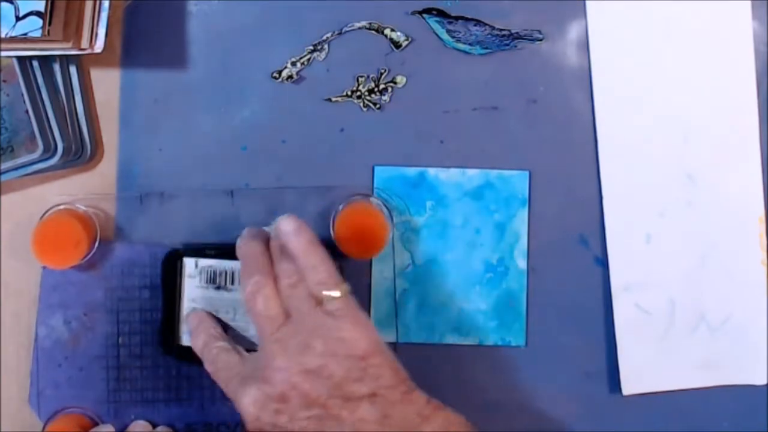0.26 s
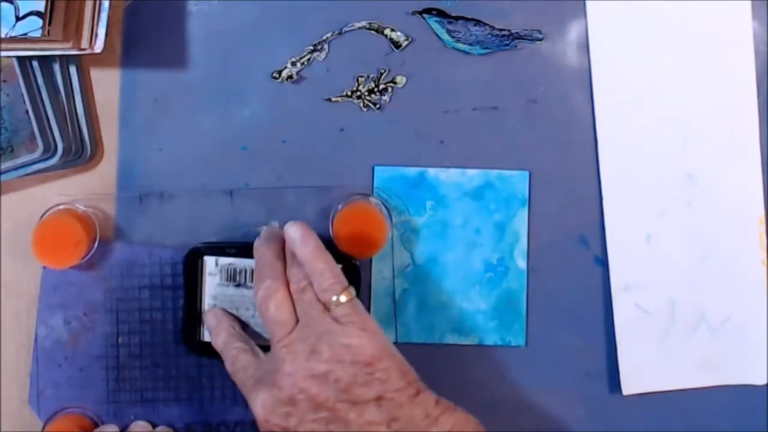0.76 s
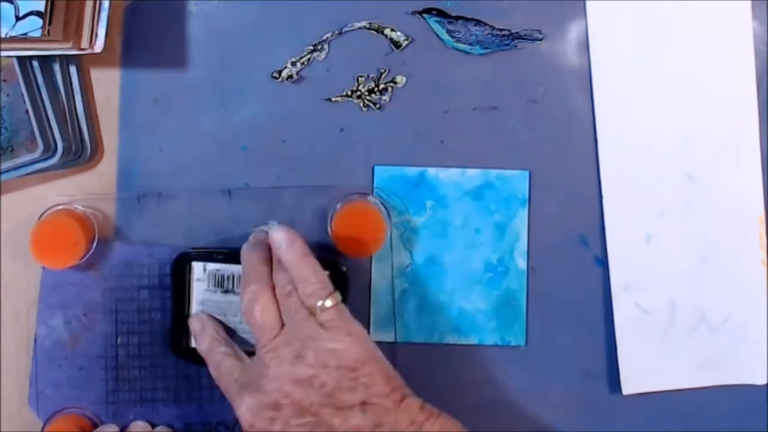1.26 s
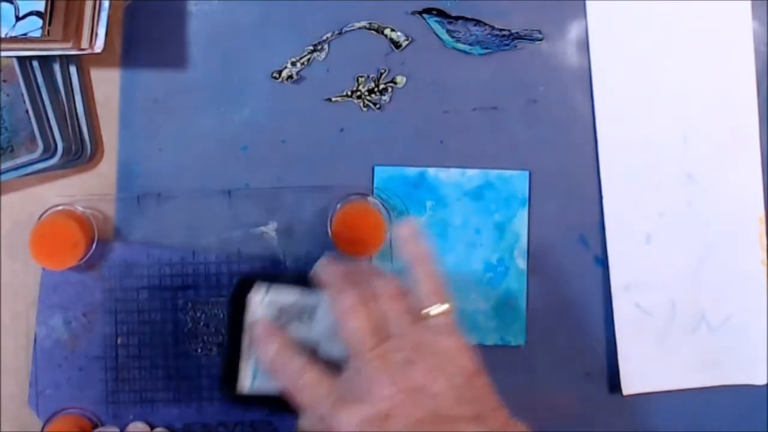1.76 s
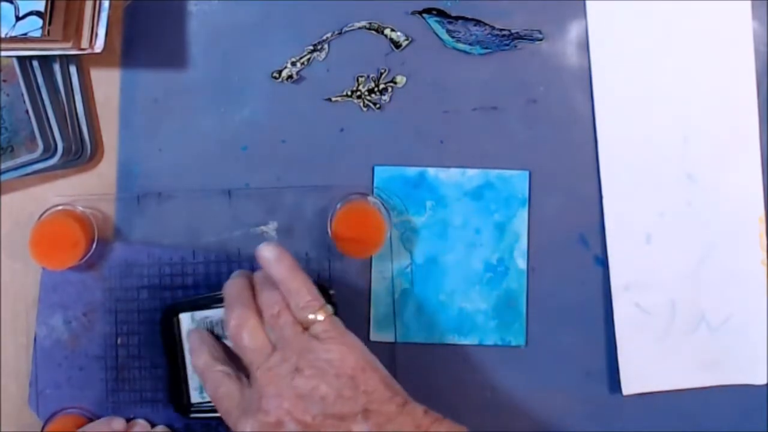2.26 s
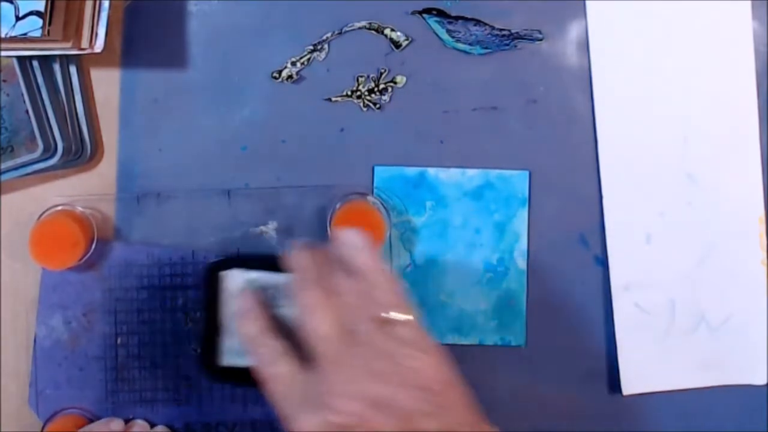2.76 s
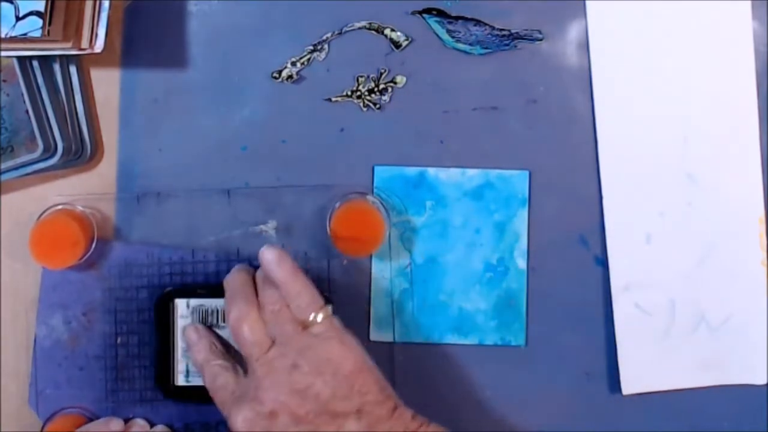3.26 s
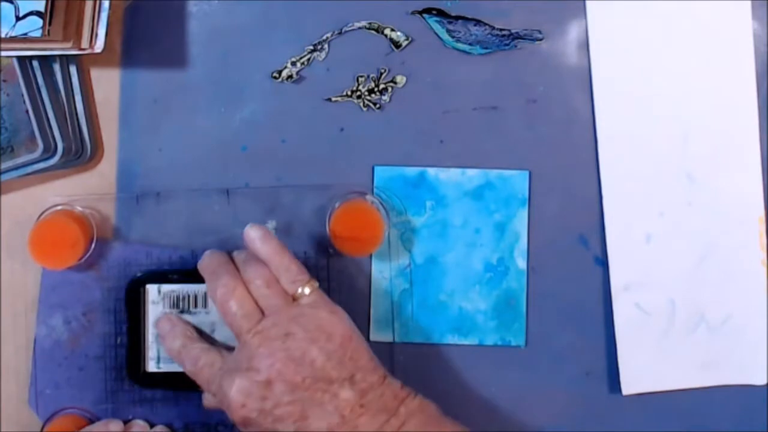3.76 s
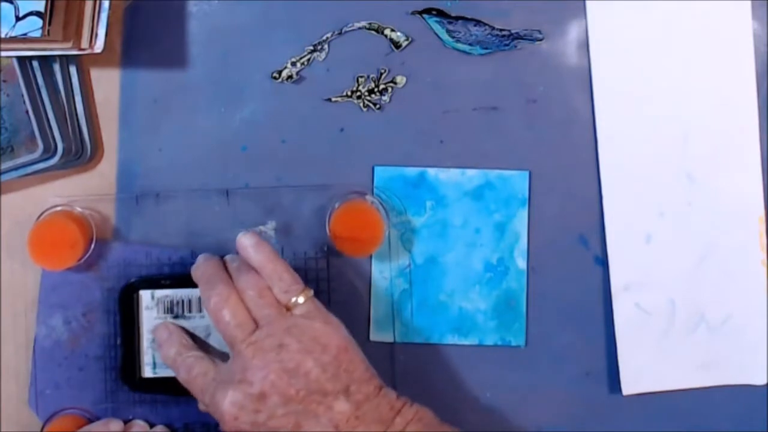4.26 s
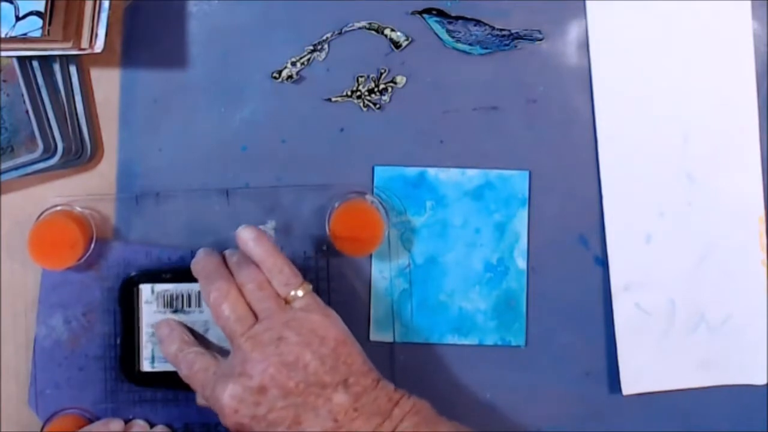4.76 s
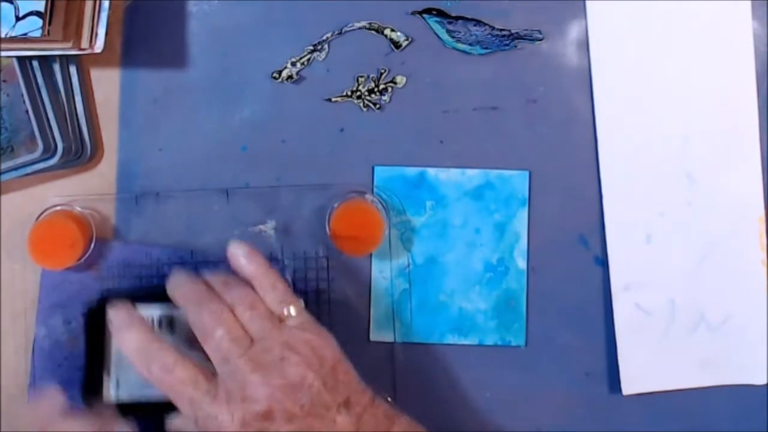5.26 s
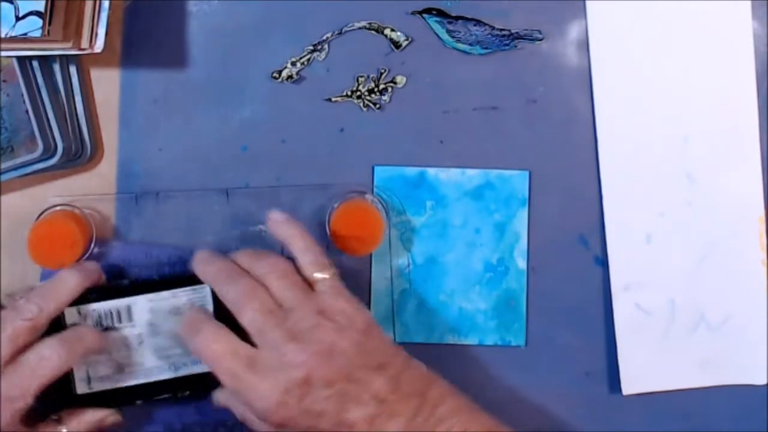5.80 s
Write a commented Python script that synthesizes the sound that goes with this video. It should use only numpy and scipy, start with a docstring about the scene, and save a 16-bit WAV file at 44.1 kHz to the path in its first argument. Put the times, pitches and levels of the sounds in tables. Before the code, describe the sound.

A hand dabs a plastic-cased ink pad onto a rubber stamp on a hollow table. Soft, dull thumps come unevenly, with a brief creak around two seconds, then harder plastic knocks and small rocking rattles from three seconds. Foam squashes and tacky ink crackles on lifting. Later taps soften, ending in sliding and rubbing. Small quiet room, close stereo microphones above the table, faint low rumble.

```python
"""Dull thumps, plastic knocks and sticky crackles: a hand taps an ink pad in a plastic case onto a rubber stamp
on a hollow table in a small quiet room. Each push makes the table ring as a sum of dying sines.
Random clicks, coloured or ringing the case, make squashed foam, peeling ink, rubbing and creaks.
Two microphones above the table lose the deepest bass; a faint whine joins in, and a crude rate converter
mirrors the thumps into the treble."""
import sys
import numpy as np
from scipy import signal
from scipy.fft import rfft, irfft
from scipy.io import wavfile
from scipy.ndimage import uniform_filter1d, map_coordinates

SR = 44100
rng = np.random.default_rng(int(sys.argv[2]) if len(sys.argv) > 2 else 0)


def waveform_to_disk(signal):
    """Save audio, clipped to [-1, 1], as 16-bit WAV at the path in sys.argv[1]."""
    frames = np.transpose(np.atleast_2d(signal))
    scaled = np.clip(frames, -1, 1) * 32767
    samples = np.round(scaled).astype(np.int16)
    wavfile.write(sys.argv[1], SR, samples)


def ratio(d):
    """dB to gain"""
    e = np.asarray(d, float) / 20
    return 10 ** e


N = 266011  # length [samples]

# t60 is the time in which a ringing sound falls by 60 dB
# ringing of the plastic case: (frequency [Hz], level [dB], t60 [s])
CASE = [(404, 4, 0.013), (655, 3.5, 0.013), (807, -8.5, 0.022), (1075, 2.5, 0.0078), (1205, 5, 0.014),
        (1438, -6, 0.011), (1820, -13, 0.012), (2200, -8.5, 0.013)]
# ringing of its thin lid: (frequency [Hz], level [dB], t60 [s])
LID = [(2400, -2.5, 0.027), (3140, 2.5, 0.014), (3840, 7.5, 0.0076), (4650, -17, 0.013), (6090, -4, 0.0068),
       (8800, -35, 0.0053)]


def evened(x):
    """Scales a sound to an rms (average strength) of 1."""
    return x / np.sqrt(np.mean(x ** 2) + 1e-20)


def read(points, hz):
    """Reads a table of (frequency, value) between its points, on a log-frequency axis."""
    f, value = np.transpose(points)
    return np.interp(np.log(hz + 1), np.log(f + 1), value)


def add(mix, s, sound):
    """Mixes a sound in at time s [s]."""
    part = mix[max(round(s * SR), 0):][:len(sound)]
    part += sound[:len(part)]


def coloured(x, spectrum):
    """Filters a sound to a spectrum, rms 1."""
    gain = ratio(read(spectrum, np.fft.rfftfreq(len(x), 1 / SR)))
    return evened(irfft(rfft(x) * gain, len(x)))


def patchy(x, spread_db):
    """Makes the colour uneven: random patches some 500 Hz wide and 30 ms long."""
    z = signal.stft(x, nperseg=512, noverlap=384)[2]
    field = rng.standard_normal(z.shape[::-1]).T
    for _ in range(2):
        field = uniform_filter1d(field, size=4, axis=0)
        field = uniform_filter1d(field, size=8, axis=1)
    z = z * ratio(spread_db * evened(field))
    return evened(signal.istft(z, nperseg=512, noverlap=384)[1][:N])


def crackle(per_s, spread_db):
    """Random clicks of very uneven size, about per_s of them a second."""
    size = ratio(spread_db * np.minimum(rng.exponential(1, N), 4)) * rng.standard_normal(N)
    return size * (rng.random(N) < per_s / SR)


def ring(modes, trough_s=None):
    """Sum of dying sines, starting from rest or swinging down together at trough_s."""
    t = np.arange(SR // 2) / SR
    out = np.zeros(len(t))
    for hz, db, t60 in modes:
        # a quarter of a cycle before its zero crossing a sine is at its lowest
        late = 0 if trough_s is None else trough_s + 1 / (4 * hz)
        out += ratio(db - 60 * t / t60) * np.sin(2 * np.pi * hz * (t - late))
    return out


def shaken(modes, per_s, spread_db, soft_ms):
    """Random soft jolts keep a set of modes ringing, rms 1."""
    ms = np.arange(SR // 2) / SR * 1000
    one_jolt = ring(modes, soft_ms / 1000) * (1 - np.exp(-(ms / soft_ms) ** 2))
    return evened(signal.oaconvolve(crackle(per_s, spread_db), one_jolt)[:N])


def through_lid(clicks):
    """Each click makes the lid ring, rms 1."""
    return evened(signal.oaconvolve(clicks, ring(LID))[:N])


def gesture(rise_ms, hold_ms, t60):
    """Loudness curve: smooth rise, hold, exponential fall."""
    ms = np.arange(SR // 4) / SR * 1000
    rise = np.sin(np.pi / 2 * np.minimum(ms / rise_ms, 1)) ** 2
    falling_s = np.maximum(ms - rise_ms - hold_ms, 0) / 1000
    return rise * ratio(-60 * falling_s / t60)


def air():
    """Room rumble and hiss: noise, more or less alike in both ears by pitch, flickering in random patches."""
    # spectrum: (frequency [Hz], level [dB])
    spectrum = [(20, -19.5), (40, -10), (58, -6), (81, -10.5), (222, -33.5), (450, -34.5), (1810, -45),
                (7730, -52), (8650, -66.5), (16000, -61.5)]
    # likeness of left and right: (frequency [Hz], correlation [-1 to 1])
    likeness = [(60, 1), (240, 0.73), (950, 0.57), (3770, -0.34), (15000, 0.36)]
    frames, hz = N // 512 + 5, np.fft.rfftfreq(2048, 1 / SR)
    a, b, c, d, patches = rng.standard_normal((frames, 1025, 5)).T
    patches = evened(uniform_filter1d(uniform_filter1d(patches, 30, 0), 8, 1))
    same = np.clip(read(likeness, hz), -1, 1)[:, None]
    left, unrelated = a + 1j * b, c + 1j * d
    z = np.array([left, same * left + np.sqrt(1 - same ** 2) * unrelated])
    z *= ratio(read(spectrum, hz)[:, None] + 1.8 * patches)
    pair = evened(signal.istft(z, nperseg=2048, noverlap=1536)[1][:, :N])
    return ratio(-61) * pair * ratio(np.array([[.8], [-.8]]))  # a little louder on the left


def room(x):
    """Echoes off the room: sparse taps of random sign, each band dying at its own speed."""
    # how long the echoes last: (frequency [Hz], t60 [s])
    lasting = [(100, 0.12), (400, 0.25), (1200, 0.15), (3000, 0.067), (8000, 0.053)]
    # how strong they are: (frequency [Hz], level [dB])
    strength = [(60, -35), (250, -20), (600, -5.5), (1200, -3.5), (4000, -1), (10000, 1)]
    taps = np.zeros((2, SR // 2))
    at = np.arange(120, SR // 2 - 20, 20)
    at = at + rng.integers(0, 20, (2, len(at)))
    np.put_along_axis(taps, at, rng.choice([-1., 1.], at.shape), 1)
    hz, t, z = signal.stft(taps, SR, nperseg=512)
    t60 = read(lasting, hz)
    decay = ratio(-60 * t / t60[:, None])
    # longer echoes are turned down, so that the strength table alone sets the energy of a band
    decay *= (ratio(read(strength, hz)) / np.sqrt(t60 * SR / 20 / np.log(1e6)))[:, None]
    echoes = signal.istft(z * decay, SR, nperseg=512)[1]
    return signal.fftconvolve(x[None], echoes, axes=1)[:, :N]


def slides():
    """Fingers and pad slide over the mat: grainy friction, a low drag of the case and a dry hiss of skin."""
    # one list for each slide: (time [s], drag level [dB], skin hiss level [dB])
    strokes = [
        [(1.58, -119, -99), (1.646, -62.5, -79), (1.732, -100, -84.5), (1.798, -72, -82), (1.874, -89, -92),
         (1.96, -103, -100)],
        [(5.24, -45, -41), (5.258, -59, -70), (5.29, -88, -85), (5.324, -69, -95), (5.54, -74, -82.5),
         (5.702, -67, -67.5), (5.76, -74, -70), (5.926, -72.5, -78), (5.976, -82, -74), (6.03, -72, -65)],
    ]
    # spectra of drag and skin: (frequency [Hz], level [dB])
    drag_colour = [(150, -3), (250, -5), (433, -0.5), (701, -8), (963, -11.5), (1290, -11.5), (1650, -22),
                   (2500, -43), (3250, -82)]
    skin_colour = [(700, -18), (1200, -2.5), (2340, 3), (3140, 0.5), (5030, 2.5), (12000, -30),
                   (15600, -58)]
    # the case rings under the drag: (frequency [Hz], level [dB], t60 [s])
    scrape = [(460, 8, 0.039), (544, 1.5, 0.13), (1036, 4, 0.029), (1300, -33, 0.04)]
    out, t = np.zeros(N), np.arange(N) / SR
    drag = coloured(crackle(1700, 2.0), drag_colour)
    skin = patchy(coloured(crackle(9700, 0.37), skin_colour), 2.6)
    drag = evened(drag + shaken(scrape, 490, 1.1, 0.23))
    for rows in strokes:
        s, drag_db, skin_db = np.transpose(rows)
        edges = np.clip(np.minimum(t - s[0], s[-1] + .04 - t) / 0.035, 0, 1)
        out += edges * ratio(np.interp(t, s, drag_db)) * drag
        out += edges * ratio(np.interp(t, s, skin_db)) * skin
    return out


def whistles():
    """A thin whistle of the case, held down or rubbed: tiny slips keep one narrow mode going."""
    # (time [s], level [dB], hold [ms], frequency [Hz])
    whistle_list = [(2.36, -84.5, 49, 4560), (5.367, -77.5, 110, 1300)]
    out = np.zeros(N)
    for s, db, hold_ms, hz in whistle_list:
        level = ratio(db) * gesture(6.6, hold_ms, 0.054)
        tone = shaken([(hz, 0, .03)], 5400, .6, .12)
        add(out, s, level * tone[-len(level):])
    return out


def creak():
    """Slips of the pressed pad keep narrow modes singing: steady lines in a fuzz; the high ones slide down."""
    # (time [s], low mode level [dB], middle modes level [dB], high modes level [dB])
    levels = [(2.009, -79, -64, -74.5), (2.081, -77, -86.5, -74), (2.12, -98, -72.5, -90.5),
              (2.159, -76, -67.5, -72.5), (2.2, -65, -72.5, -80.5), (2.23, -70.5, -74, -75),
              (2.265, -94, -69, -81)]
    # the modes of each group: (frequency [Hz], level [dB], t60 [s])
    low = [(345.6, 0, 0.22)]
    middle = [(1088, 5, 0.077), (1575, 0, 0.077)]
    high = [(2430, -7, .05), (2850, -12, .04), (3375, 0, .06)]
    t, (s, *levels_db) = np.arange(N) / SR, np.transpose(levels)
    edges = np.clip(np.minimum(t - s[0], s[-1] - t) / 0.0054, 0, 1)
    wander = uniform_filter1d(uniform_filter1d(rng.standard_normal(N), size=600), size=600)
    wander = 2.6 * evened(wander)  # phase [radians]
    sag_per_s, true_pitch_s = .14, 2.12  # pitch falls by this share a second, and is as listed at this time
    slowed = t - sag_per_s * (t - true_pitch_s) ** 2 / 2
    out = np.zeros(N)
    for db, modes, clock in zip(levels_db, (low, middle, high), (t, t, slowed)):
        lines = np.zeros(N)
        for hz, mode_db, _ in modes:
            lines += ratio(mode_db) * np.sin(2 * np.pi * hz * t + wander)
        fuzz = shaken(modes, 5000, .6, .12)
        sound = evened(evened(lines) + 1.1 * fuzz)
        out += ratio(np.interp(t, s, db)) * map_coordinates(sound, [clock * SR], order=3)
    return edges * out


def peels():
    """Sticky ink lets go as the pad lifts: threads snap in a dense crackle, heard partly through the lid."""
    # (time [s], level [dB], length before the fade [ms])
    peel_list = [(0.174, -76, 23), (0.506, -74.5, 26), (1.24, -74, 9.9), (1.385, -80, 23), (2.378, -75, 41),
                 (2.56, -77, 45), (3.272, -62.5, 24), (3.577, -69, 16), (3.608, -63, 19),
                 (3.837, -61.5, 16), (4.176, -74, 20), (4.368, -61.5, 9.5), (4.53, -75.5, 24),
                 (4.708, -68.5, 31), (4.848, -71, 47), (5.045, -75.5, 92), (5.095, -56.5, 21),
                 (5.13, -72, 110), (5.202, -67.5, 43)]
    # spectrum of the snapping ink: (frequency [Hz], level [dB])
    tack = [(600, -13.5), (1500, -3), (2200, -7.5), (4500, 1.5), (16000, -34.5)]
    level = np.zeros(N)
    for s, db, length_ms in peel_list:
        rise_ms = 3 + 0.06 * length_ms  # longer peels start more gently
        hold_ms = max(length_ms - rise_ms, 0)
        add(level, s, ratio(db) * gesture(rise_ms, hold_ms, 0.1))
    snaps = crackle(2800, 4.0)
    return level * patchy(coloured(snaps, tack) + 0.45 * through_lid(snaps), 2.0)


def knocks():
    """Single blows make the case ring; bright ones wake the lid; thin lid ticks ring on their own pitch."""
    # sharp knocks: (time [s], level [dB], level of lid and snap against the case [dB])
    knock_list = [(0.046, -43, -15), (0.363, -36.5, -22.5), (.381, -38.5, -29), (1.101, -40, -11),
                  (2.023, -50.5, -23), (2.273, -52, -11), (2.293, -38.5, -32), (3.096, -32, -31.5),
                  (3.105, -35.5, -12.5), (3.123, -27.5, -29), (3.431, -32.5, -13), (3.444, -27.5, -30),
                  (3.695, -11.5, -42.5), (3.698, -20, -18), (3.911, -37.5, -21), (4.268, -26, -29)]
    # thin ticks of the lid alone: (time [s], level [dB], frequency [Hz])
    ticks = [(0.39, -54, 6080), (3.281, -49, 3810), (3.842, -49.5, 3025), (4.375, -56.5, 3140),
             (5.115, -52, 4100), (5.207, -47, 2400), (5.604, -54, 5160), (6.008, -50, 4240)]
    out, t = np.zeros(N), np.arange(SR // 2) / SR
    onset = 1 - np.exp(-(t / 0.002) ** 2)  # plastic gives a little before it rings
    case, lid = ring(CASE, 0.0007) * onset, ring(LID)
    noise = rng.standard_normal((len(knock_list + ticks), len(t)))
    snaps = np.gradient(noise, axis=1) * ratio(-60 * t / 0.01)
    for (s, db, bright_db), snap in zip(knock_list, snaps):
        add(out, s - .0006, ratio(db) * (case + ratio(bright_db) * (lid + 0.28 * snap)))
    for (s, db, hz), snap in zip(ticks, snaps[len(knock_list):]):
        add(out, s, ratio(db) * (0.34 * lid + ring([(hz, 0, .016)]) + 0.16 * snap))
    return out


def pushes():
    """Lists all pushes: (trough [s], top [dB], sway [dB], box [dB], swell [ms], free ring [ms])."""
    # the pad lands or bounces on the stamp:
    # (time of the first deep trough [s], force [dB], hardness [dB], swell [ms], free ring [ms])
    taps = [(0.037, -23, -9.5, 7.5, 23.7), (0.371, -22, -2.5, 10, 28), (0.647, -21.5, -4.5, 8, 36),
            (1.11, -22.5, -2, 10.4, 39), (1.277, -50.5, -20, 18, 27), (1.999, -32.5, -10.5, 6.6, 78),
            (2.282, -25, -4, 9.5, 39), (2.489, -34, -16, 14.6, 51), (3.115, -20, 5.5, 10.6, 27),
            (3.440, -19, 10, 11.1, 11), (3.479, -29, -10, 7, 18), (3.711, -18, 4.5, 10, 42),
            (3.784, -29.5, -24, 17, 24), (3.927, -21, 7, 10.5, 30), (4.281, -22.5, 8.5, 9.8, 35),
            (4.337, -41, -3, 2, 160), (4.453, -29, -15.5, 8, 51), (4.634, -23, -3.5, 12.1, 41),
            (4.965, -28.5, -5.5, 9.6, 60)]
    # the hand leans on the table and sways its frame: (time of the trough [s], level [dB], swell [ms])
    leans = [(4.811, -37.5, 23.3), (4.902, -39.5, 25.6), (5.133, -49, 14), (5.434, -50.5, 20),
             (5.637, -55, 11), (5.95, -38, 30), (6.011, -51, 6.3)]
    out = []
    for s, db, hard_db, swell_ms, free_ms in taps:
        sway_db = db - 9 + .45 * hard_db  # harder taps rock the frame more
        out.append((s, db, sway_db, db + hard_db, swell_ms, free_ms))
    for s, db, swell_ms in leans:
        out.append((s, db - 17, db, db - 19.5, swell_ms, 89))
    return out


def squashes():
    """Foam cells collapse in a rush of clicks that shake the case and fizz, just before each trough."""
    # spectrum of the foam: (frequency [Hz], level [dB])
    foam = [(880, -19), (1500, 1.5), (2340, -3), (4080, -7), (5660, -10), (10000, -38.5), (16000, -34.5)]
    case, fizz = np.zeros(N), np.zeros(N)
    rise_ms, hold_ms = 10.7, 32.6
    for trough_s, _, _, box_db, swell_ms, _ in pushes():
        s = trough_s - (13.4 + 1.064 * swell_ms) / 1000
        # both grow with the blow to the boxy upper panel
        case_db, fizz_db = -36 + 0.82 * box_db, -43 + 0.75 * box_db
        add(case, s, ratio(case_db) * gesture(rise_ms, hold_ms, 0.021))
        burst, tail = gesture(rise_ms, 0.32 * hold_ms, 0.053), gesture(rise_ms, hold_ms, 0.45)
        add(fizz, s, ratio(fizz_db) * (burst + 0.22 * tail))
    cells = crackle(4000, 2.5)
    jolts = patchy(shaken(CASE, 1200, 3.5, .9), 2.5)
    return case * jolts + fizz * patchy(coloured(cells, foam) + 0.1 * through_lid(cells), 3)


def rocks():
    """The pad, rocking after a hard tap, knocks dully on the stamp block: woody modes and a rattle."""
    # (time [s], level [dB])
    rock_list = [(2.022, -45.5), (0.439, -47.5), (3.189, -38.5), (3.329, -50), (3.524, -32.5), (3.586, -32),
                 (3.63, -40.5), (3.66, -45), (4.008, -36), (4.027, -42.5), (4.052, -34.5), (4.077, -46.5),
                 (4.123, -54.5), (4.396, -44.5)]
    # woody modes: (frequency [Hz], level [dB], t60 [s])
    woody = [(148, -2, 0.089), (216.3, -3.5, 0.18), (306, -13.5, 0.086), (370, -13, 0.079),
             (496, -11.5, 0.06), (800, -12, 0.032)]
    swell_ms = 5.5
    rattle, out, ms = np.zeros(N), np.zeros(N), np.arange(SR // 2) / SR * 1000
    swell = 1 - np.exp(-(ms / swell_ms) ** 2)
    chances = rng.standard_normal((len(rock_list), len(woody), 2))
    for (s, db), chance in zip(rock_list, chances):
        # pitches and levels are never quite alike
        modes = [(hz * (1 + .06 * a), mode_db + 2.5 * b, t60)
                 for (hz, mode_db, t60), (a, b) in zip(woody, chance)]
        add(out, s - swell_ms / 1000, ratio(db) * swell * ring(modes, swell_ms / 1000))
        add(rattle, s, ratio(db - 11) * gesture(swell_ms, swell_ms, 0.19))
    return out + rattle * shaken(woody, 400, 2, swell_ms)


def table():
    """The table's modes swell as the force builds; then the weight of the hand settles and damps the top."""
    # modes of the swaying frame, the top and the boxy upper panel: (frequency [Hz], level [dB], t60 [s])
    sway_modes = [(45, 18, 0.057), (62.43, 2, 0.32)]
    top_modes = [(78.6, -21.5, 0.88), (108.8, 6, 0.28), (127.4, -18, 0.39)]
    box_modes = [(176.1, -24.5, 0.5), (212.1, -5.5, 0.084), (261.3, 5.5, 0.054), (314.2, -22.5, 0.13),
                 (365.4, -15.5, 0.09)]
    sag, sag_ms = 0.15, 39.5  # the pitch of the top sinks by this share, at this pace
    out, shudder, ms = np.zeros(N), np.zeros(N), np.arange(SR // 2) / SR * 1000
    for s, top_db, sway_db, box_db, swell_ms, free_ms in pushes():
        lead = 1.71 * swell_ms / 1000  # from the start of the push to its trough [s]
        swell = 1 - np.exp(-(ms / swell_ms) ** 2)
        after_free_ms = ms - 1000 * lead - free_ms
        # after the free ring the top drops quickly, then dies under the hand with a t60 of 0.24 s
        settle = 0.43 + 0.72 / (1 + np.exp(np.clip(after_free_ms / 2.0, -50, 50)))
        settle = settle * ratio(-60 * np.maximum(after_free_ms / 1000, 0) / 0.24)
        # a clock that runs fast, then slow, and is right at the trough
        gained_ms = sag * sag_ms * (np.exp(-1000 * lead / sag_ms) - np.exp(-ms / sag_ms))
        sagging_ms = ms * (1 - sag / 2) + 500 * lead * sag + gained_ms
        top = np.interp(sagging_ms, ms, ring(top_modes, lead))
        top = top * (1 - np.exp(-(ms / (1.55 * swell_ms)) ** 2))  # the heavy top swells more slowly
        waves = ratio(top_db) * top * settle
        waves += ratio(sway_db) * ring(sway_modes, lead + .002)
        waves += ratio(box_db) * ring(box_modes, lead + 0.00053)
        add(out, s - lead, swell * waves)
        add(shudder, s - lead, ratio(box_db - 27.0) * gesture(swell_ms, free_ms, 0.27))
    # loose things on the table keep jolting its upper modes, the case and, more softly, the top
    box = shaken(box_modes, 400, 2.2, 2.37)
    case = shaken(CASE[:3], 500, 2.5, 1.5)
    low = shaken(sway_modes + top_modes, 150, 2.5, 6)
    return out + shudder * (box + 0.29 * case + 0.68 * low)


def scene():
    """Mixes all sources; the left microphone is nearer the hand: louder, and ahead in phase."""
    # left ahead of right: (frequency [Hz], phase [radians])
    left_lead = [(300, 0.062), (1300, 0.12), (2200, 1.6), (3800, 1.13), (7400, 1.4), (8500, .4),
                 (12000, .05)]
    near = table() + rocks() + squashes() + knocks() + peels() + slides() + creak() + whistles()
    turn = np.exp(.5j * read(left_lead, np.fft.rfftfreq(N, 1 / SR)))  # half the lead for each side
    pair = irfft(rfft(near) * np.array([ratio(1.2) * turn, ratio(-.9) / turn]), N)
    return pair + room(near) + air()


def band_limit(x):
    """A steep low-pass at the top of the band."""
    return signal.sosfilt(signal.butter(12, 16470, fs=SR, output="sos"), x)


def record(dry):
    """Adds a faint electronic whine; picking the nearest captured sample mirrors bass into the treble."""
    capture_rate, whine_hz, whine_db = 48000, 8000, -103  # [Hz], [Hz], rms [dB]
    n = np.arange(N)
    bass_cut = signal.butter(2, 35, "high", fs=SR, output="sos")
    felt = signal.sosfilt(bass_cut, dry)  # the capsules lose the deepest bass
    whined = felt + ratio(whine_db) * np.sqrt(2) * np.sin(2 * np.pi * whine_hz * n / SR)
    # times of the nearest samples at the capture rate, counted in output samples
    nearest = np.round(n * capture_rate / SR) * SR / capture_rate
    picked = np.array([map_coordinates(channel, [nearest], order=3, mode="nearest") for channel in whined])
    return band_limit(picked)


dry = scene()
out = record(dry)
waveform_to_disk(out)
```